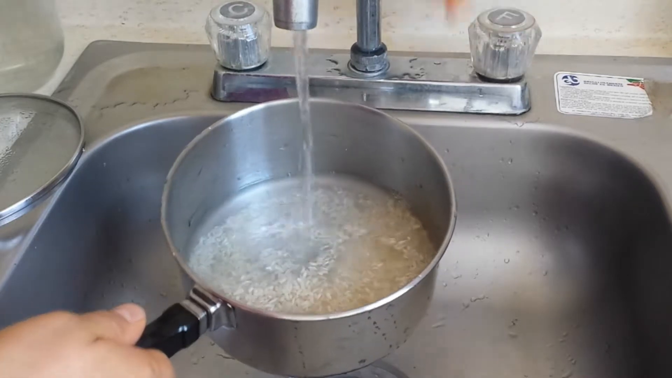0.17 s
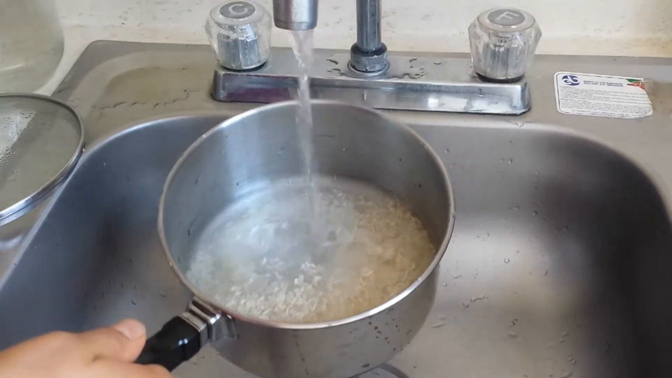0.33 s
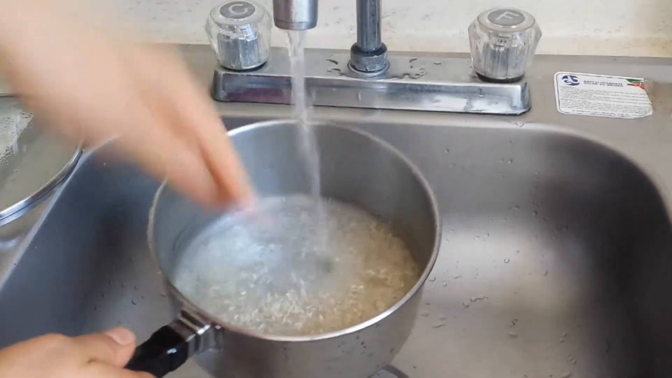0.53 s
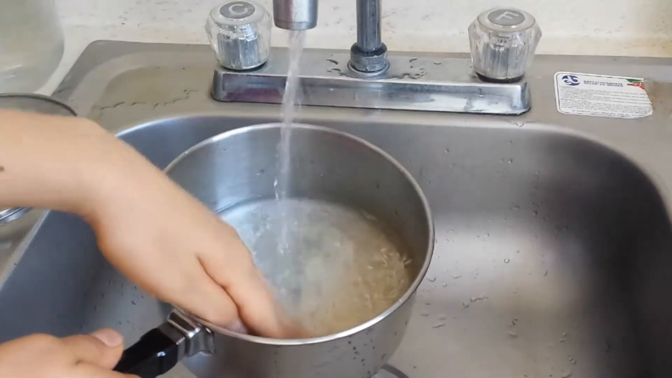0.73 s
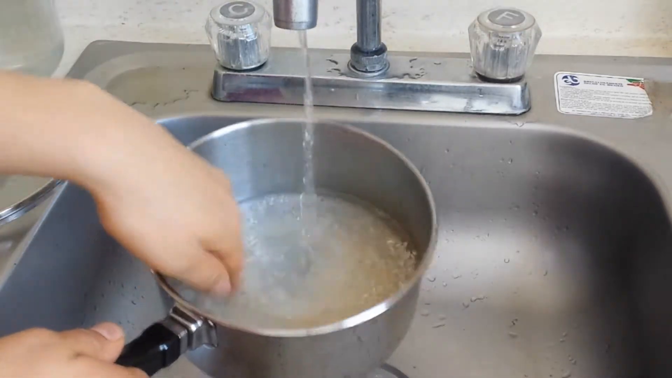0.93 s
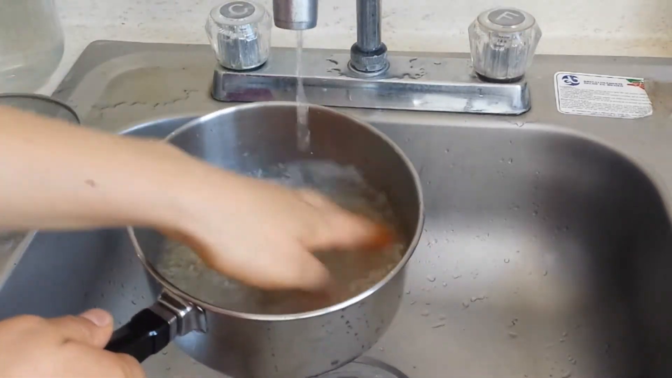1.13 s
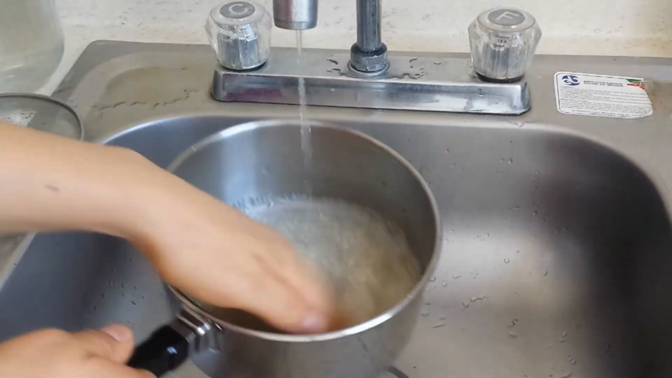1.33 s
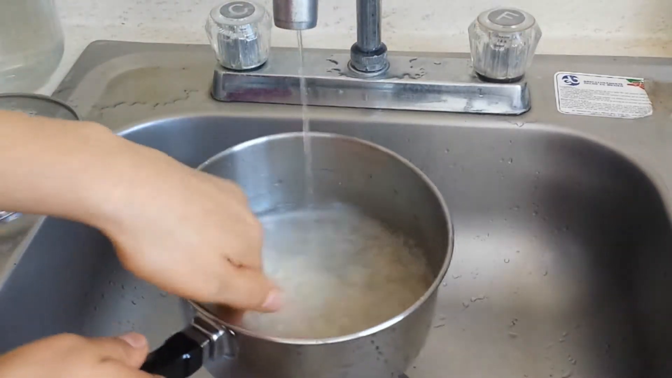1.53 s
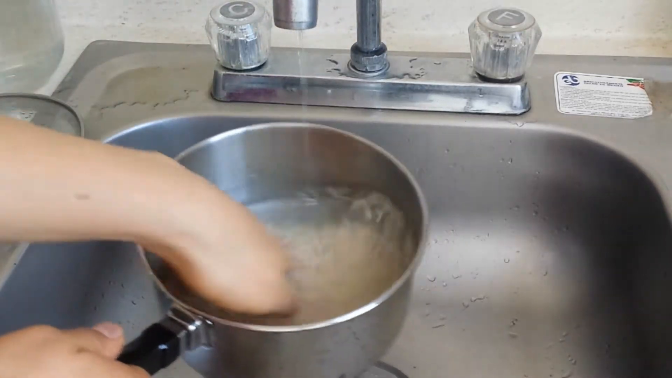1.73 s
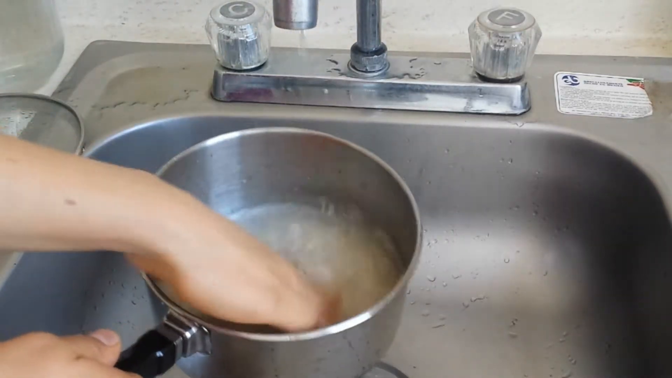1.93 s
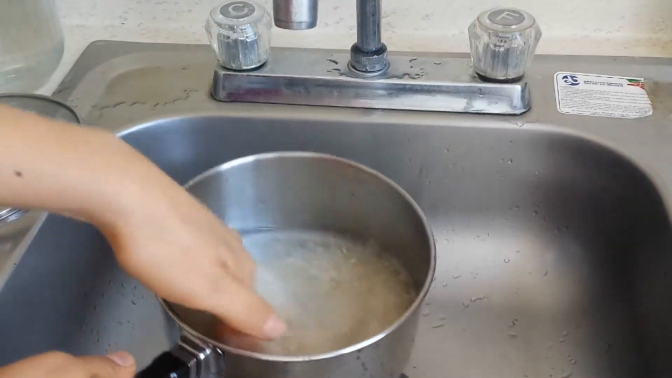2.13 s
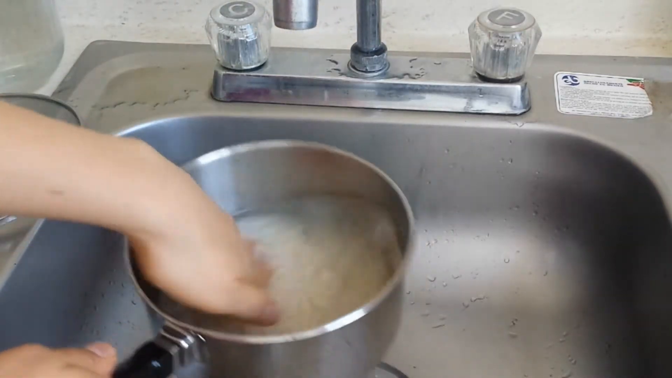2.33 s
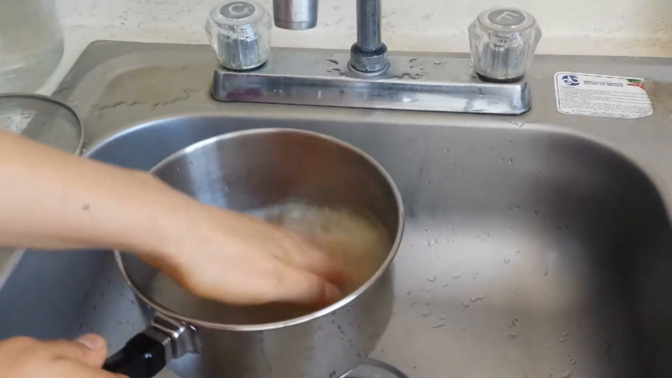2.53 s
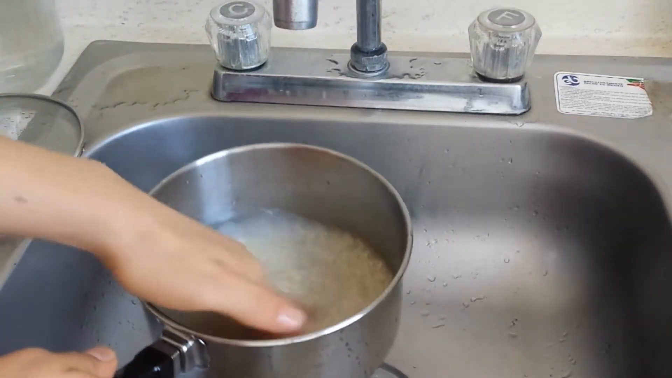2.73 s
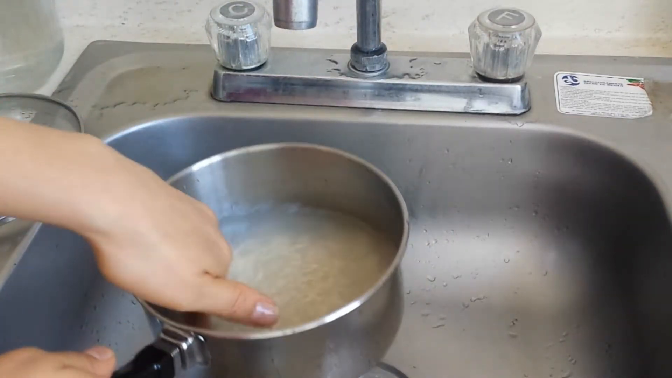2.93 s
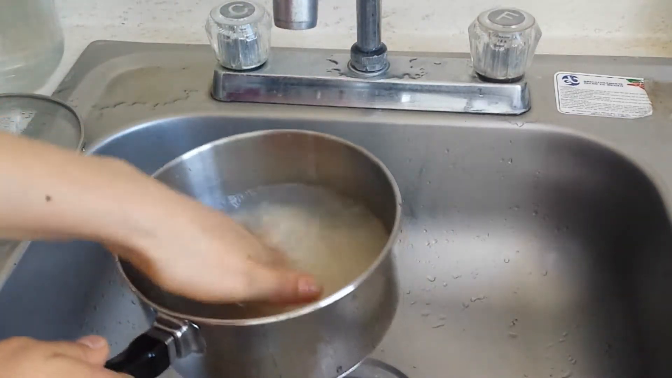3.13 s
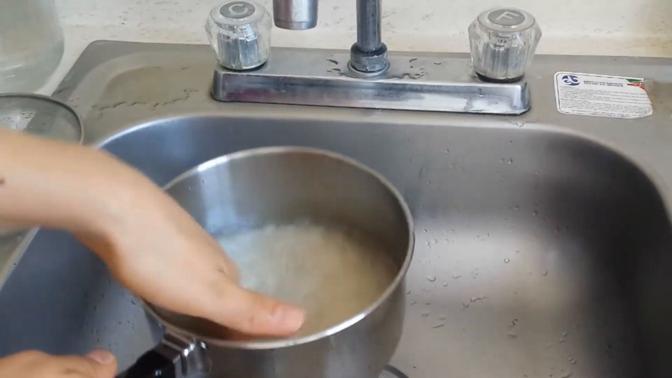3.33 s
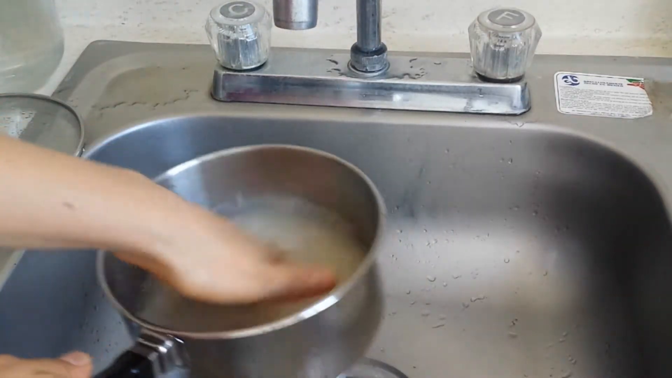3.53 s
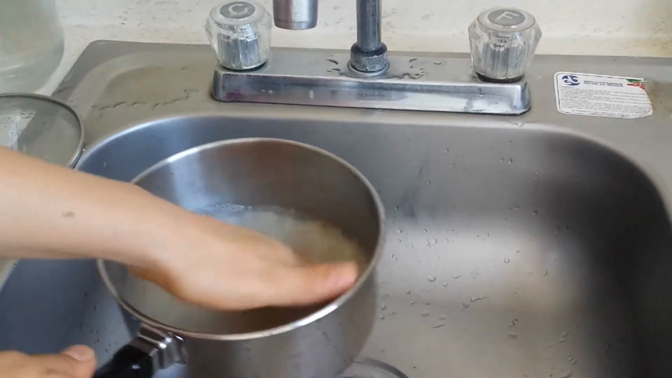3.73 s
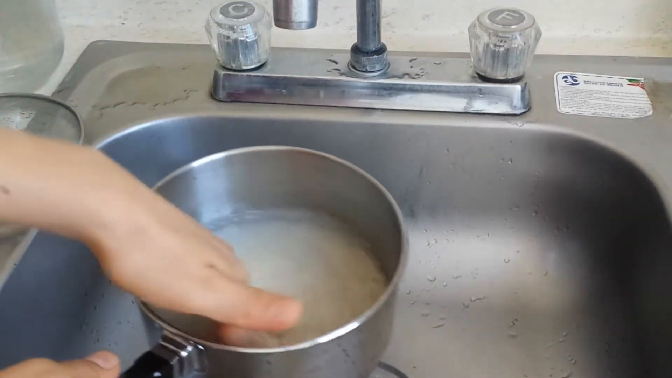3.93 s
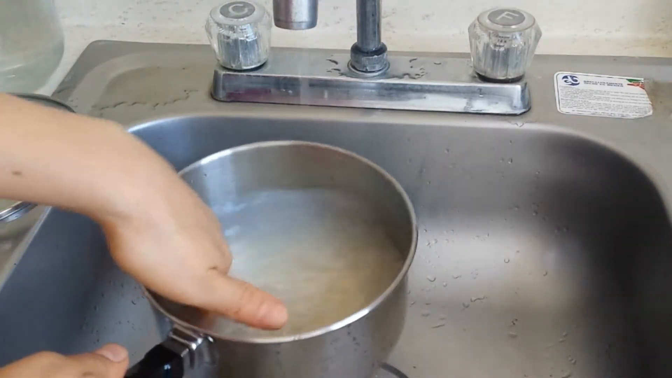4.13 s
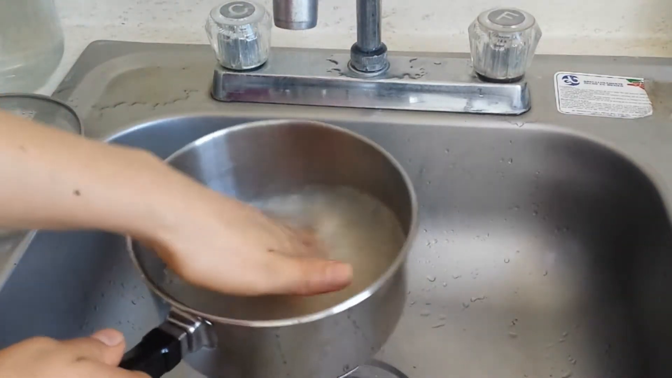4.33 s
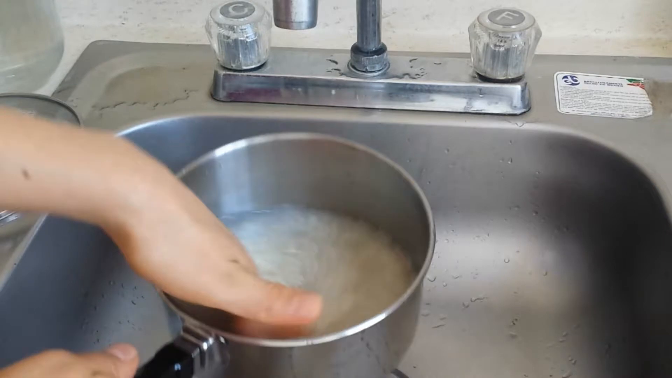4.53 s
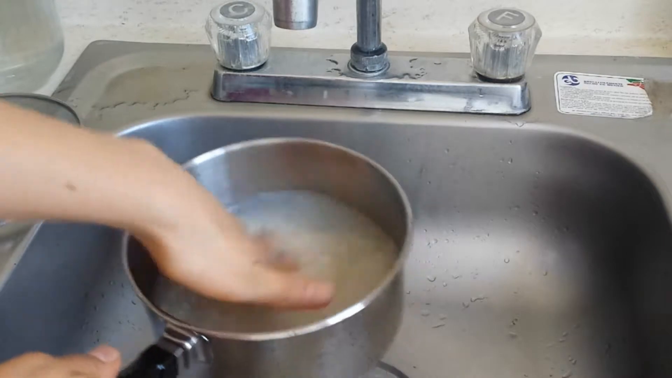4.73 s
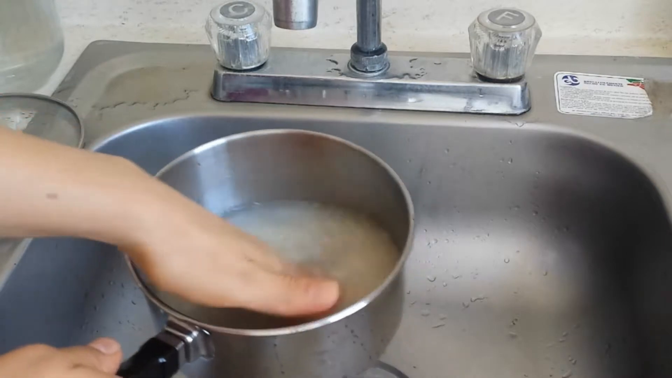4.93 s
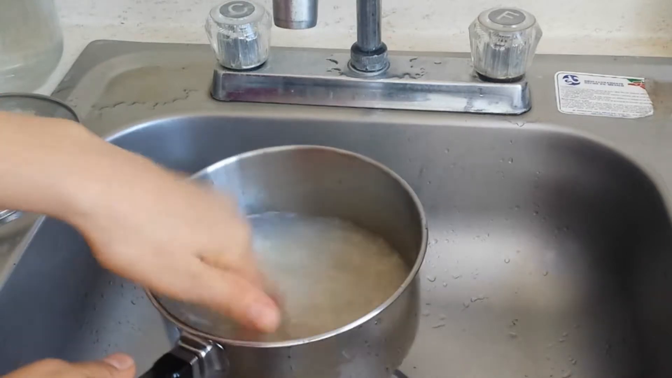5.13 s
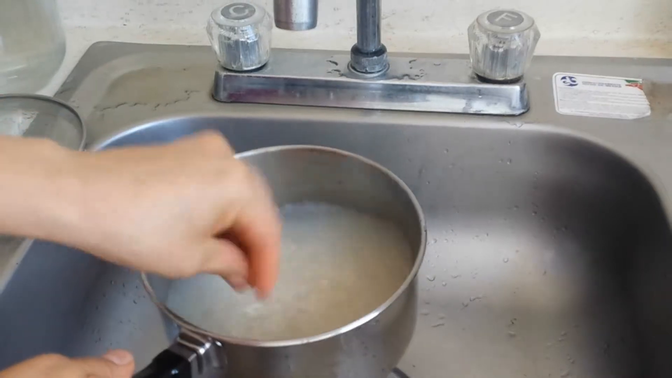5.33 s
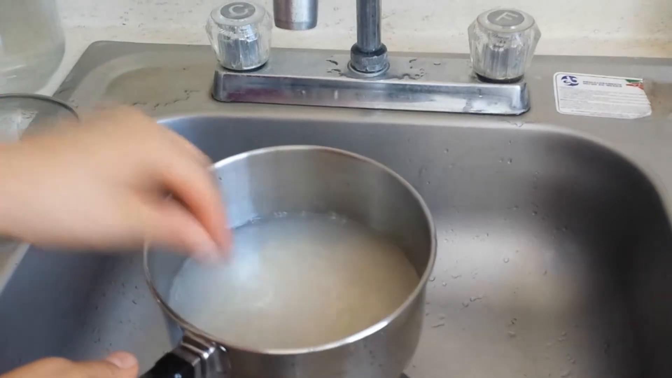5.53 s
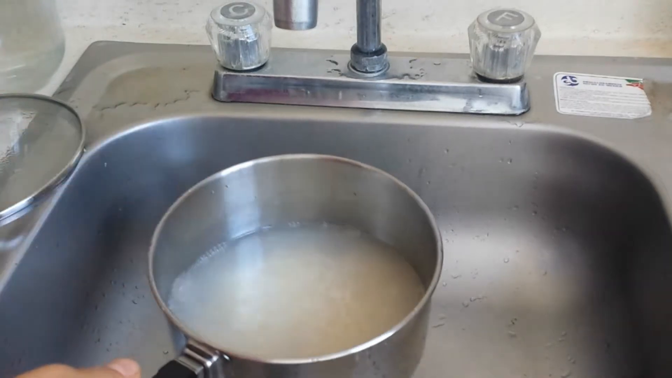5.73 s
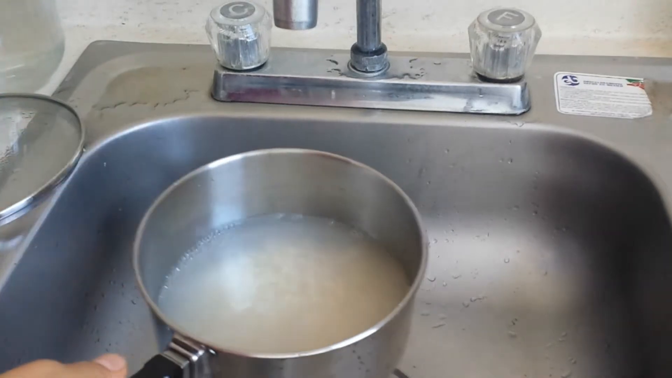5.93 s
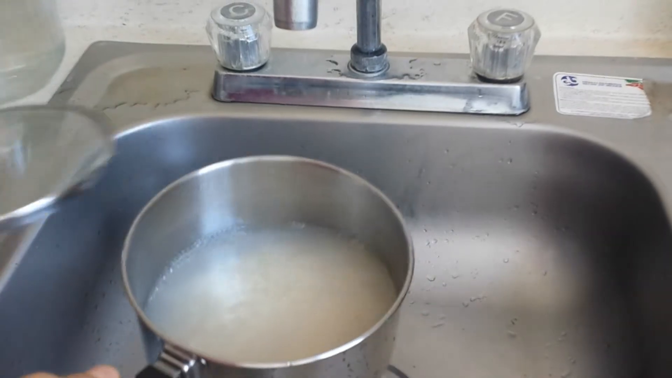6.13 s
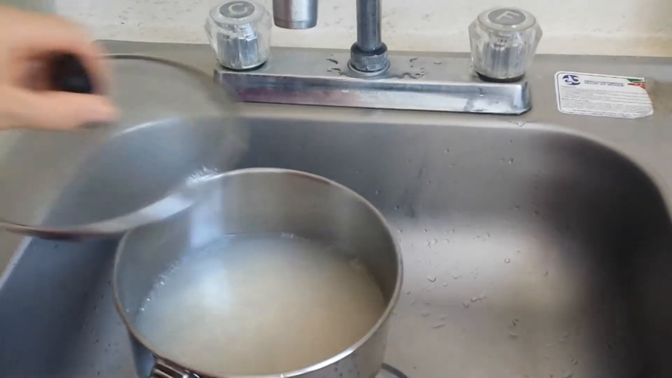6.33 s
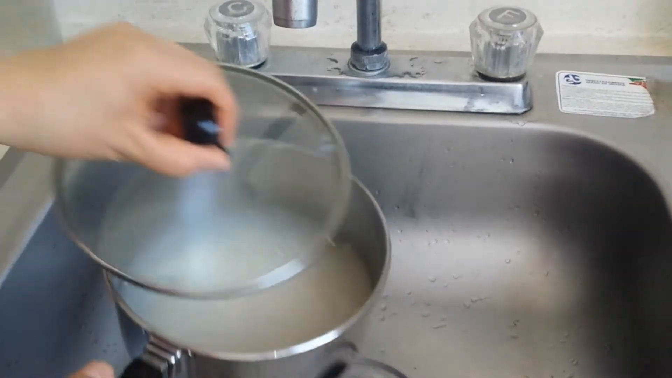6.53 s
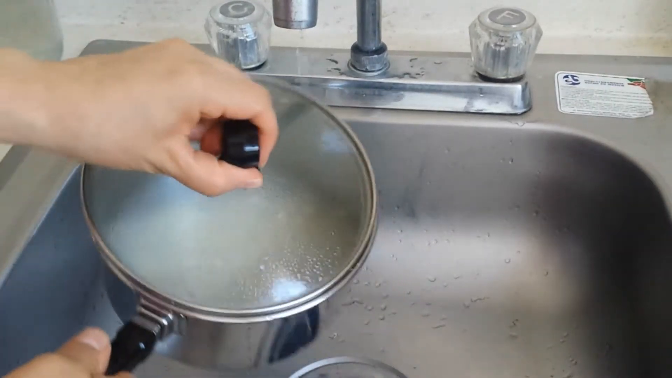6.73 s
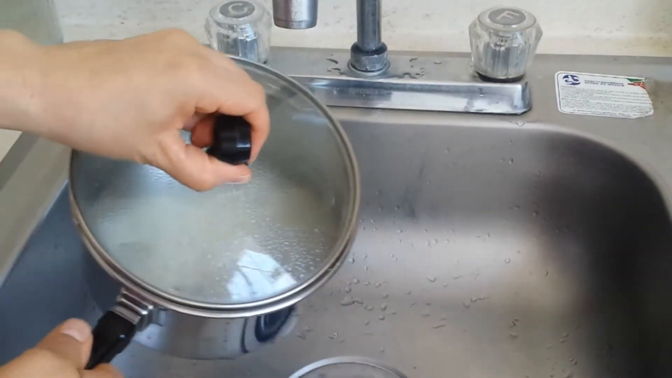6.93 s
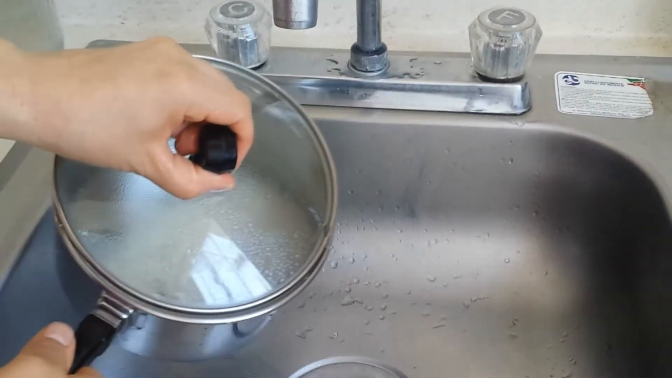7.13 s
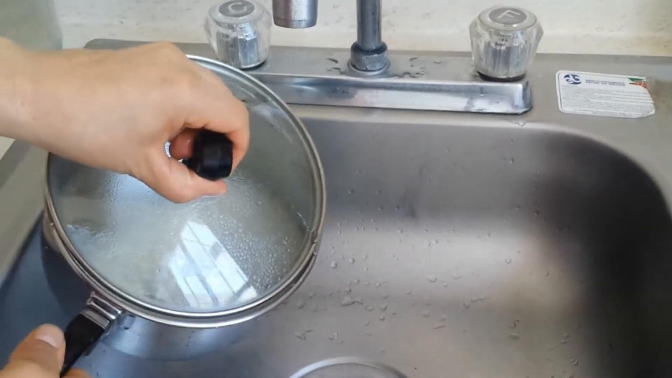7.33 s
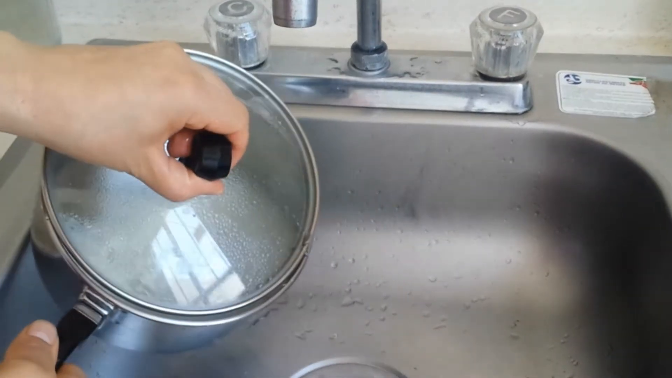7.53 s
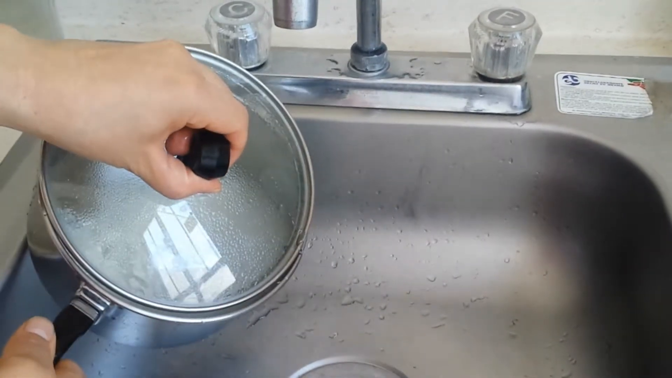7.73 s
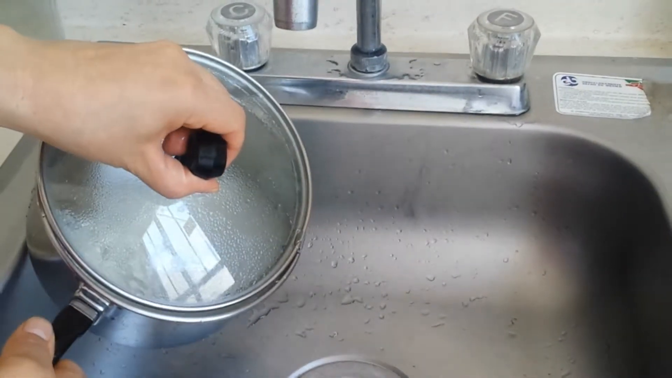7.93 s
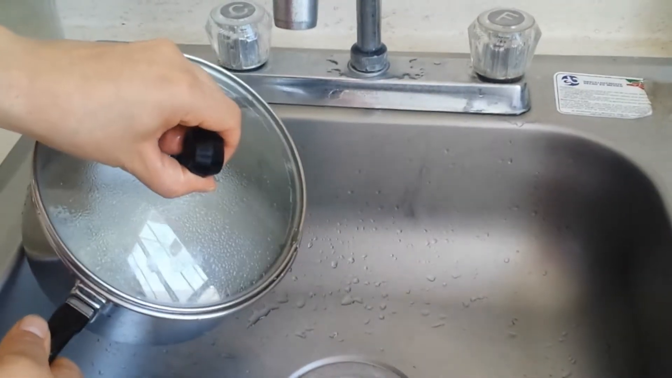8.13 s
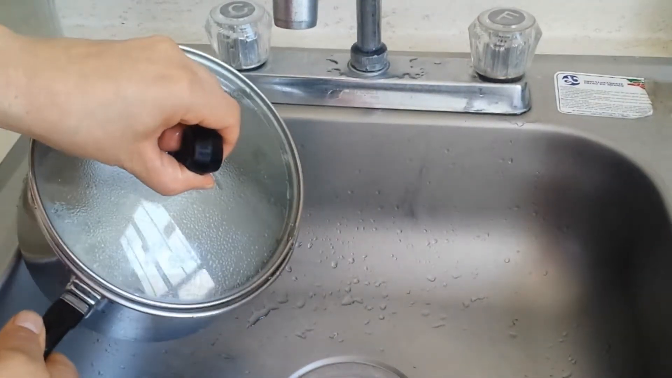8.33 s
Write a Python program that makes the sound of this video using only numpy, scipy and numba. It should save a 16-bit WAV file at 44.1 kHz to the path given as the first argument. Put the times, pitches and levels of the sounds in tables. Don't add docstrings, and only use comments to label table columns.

```python
import sys
import numpy as np
from scipy import signal
from scipy.fft import rfft, irfft, next_fast_len
from scipy.io import wavfile
from scipy.ndimage import uniform_filter1d, map_coordinates
from numba import njit

SR = 44100
rng = np.random.default_rng(int(sys.argv[2]) if len(sys.argv) > 2 else 0)


def dump(signal):
    limited = np.clip(np.atleast_2d(signal).T, -1, 1)
    pcm = np.round(limited * 32767).astype(np.int16)
    wavfile.write(sys.argv[1], SR, pcm)


def invert_db(level):
    return 10 ** (np.asarray(level, dtype=float) / 20)


N = 369999
T = np.arange(N) / SR

# [t/s, level/dB]
GAIN = [(0, -53), (1.2, -58.5), (2, -59), (2.45, -65), (3, -63), (3.7, -62), (3.95, -64.5), (4.8, -64),
        (5.3, -69.5), (6, -66), (7.2, -63), (7.8, -66.5), (8.39, -62.5)]
# [f/Hz, level/dB per Hz]
RUMBLE = [(15, -42), (25, 8.5), (119, -1.5), (162, -1), (234, -9), (294, -7.5), (350, -5), (393, -11.5),
          (578, -13), (728, -15), (2500, -25), (3250, -52.5), (5500, -120)]
# [f/Hz, level/dB per Hz]
HISS = [(710, -6.5), (1200, -12), (2060, -15), (2590, -12.5), (3700, -16), (7570, -16), (8910, -17.5),
        (16000, -18.5)]
HISS_DB = -72
HUM_DB = [2.5, 4.5, -13, 0, -4, 3, -10, -8, -33.5, -4, -19, -17]
MAINS_HZ, FRIDGE_DB = 58.3, -6
# [start t/s, end t/s, f/Hz, level/dB]
PIPES = [
    (2.94, 3.9, 74, -60),
    (1.47, 2.92, 551, -71.5),
]

# [f/Hz, t60/s]
KITCHEN = [(150, 0.59), (500, 0.65), (2000, 0.57), (6000, 0.46), (14000, 0.048)]
# [f/Hz, side minus mid level/dB]
WIDTH = [(100, -14), (400, -14), (520, -1), (2000, 0), (8000, 1)]
# [f/Hz, left minus right level/dB]
PORTS = [(60, -3), (110, 3), (200, -1), (380, -0.5), (700, -1), (1290, 1.5), (2380, -0.5), (4400, 5),
         (8120, -1.5), (15000, -13.5)]
WATER_REACH, RIM_REACH = 0.8, 0.95
SWAY_S = .00012

# [f/Hz, level/dB, t60/s]
PAN_BASE = [(222, -11.5, 0.15), (285, -3, 0.17), (345.2, 0, 0.17), (379.2, 0, .17), (406, -3.5, 0.1),
            (479, -7.5, 0.1), (554.4, -8, 0.12), (649, -6.5, 0.17), (828, -11, 0.18), (871, -11.5, 0.15),
            (1080, -9.5, 0.18)]
# [f/Hz, level/dB, t60/s]
PAN_WALL = [(1270, -22, .08), (1473, -12.5, .08), (1570, -12.5, 0.089), (1842, -7, 0.1),
            (1920, -11.5, 0.08), (2070, -13.5, 0.051), (2330, -9.5, 0.08), (2360, -6, .12)]
# [f/Hz, level/dB, t60/s]
LID_GLASS = [(3065, -8, 0.11), (3140, -22.5, .15), (4270, -8, 0.14), (4430, -8.5, .12), (5170, -7.5, 0.16),
             (5610, -29, 0.069), (5920, -21.5, .15), (6160, -25, 0.08), (6700, -10.5, 0.12),
             (7730, -16, .1), (8400, -13, 0.04)]
# [f/Hz, level/dB, t60/s]
RUBBED_WALL = [(1150, -14, 0.14), (1900, -33, 0.069), (2363, -5.5, 0.035), (2425, -3.5, 0.049),
               (3620, -10.5, 0.038)]
RING_S = .17
# [f/Hz, level/dB per Hz]
CLATTER = [(47, -63.5), (80, -31), (378, -7.5), (1220, -14), (1460, -14.5), (1700, -14), (2380, -19),
           (3620, -22), (5400, -13.5), (16000, -34)]
# [t/s, pan base level/dB, pan wall level/dB, glass level/dB, clatter level/dB]
KNOCKS = [
    (5.995, -39, -70, -79, -59.5),
    (6.393, -80.5, -80, -72, -72.5),
    (6.424, -54.5, -55.5, -61.5, -44),
    (6.662, -36.5, -47.5, -38, -28.5),
    (6.689, -36.5, -42.5, -38.5, -32.5),
    (6.714, -32.5, -46.5, -30.5, -26.5),
    (6.765, -33.5, -19.5, -28.5, -22.5),
    (6.799, -35, -39.5, -43.5, -40),
    (7.128, -65.5, -65, -66.5, -65),
]
# [t/s, length/s, pan base level/dB, pan wall level/dB, lid level/dB]
SLIDES = [(4.18, 0.072, -70, -77, -69), (4.953, 0.068, -71.5, -74, -73.5), (6.031, 0.016, -53, -60, -58.5),
          (6.058, 0.013, -45.5, -56, -39.5), (6.11, 0.039, -49, -61, -60), (6.438, 0.031, -63, -80, -78.5),
          (6.46, 0.017, -73, -59, -63), (6.507, 0.047, -58, -73, -60), (6.855, 0.053, -48.5, -65, -68.5),
          (6.972, 0.015, -56.5, -52.5, -60), (7.149, 0.049, -65, -64, -61.5),
          (8.142, 0.036, -73, -57.5, -58.5), (8.192, 0.022, -56, -69, -63), (8.312, 0.063, -64, -86, -72),
          (8.385, 0.027, -69, -73, -66.5)]
SLIDE_GLASS_DB = -4
# [t/s, peak level/dB, f/Hz, decay/cycles]
CLANKS = [(.001, -22.5, 460, 1.04), (1.156, -27, 2770, 4.7), (4.2, -61, 1150, 30), (4.25, -56, 1150, 35),
          (4.912, -62, 1900, 26), (5.993, -33.5, 407, 0.88), (6.045, -39, 3065, 40), (6.055, -33, 4280, 50),
          (6.07, -33.5, 6530, 38), (6.055, -38, 900, 25), (6.056, -31, 5500, 60), (6.075, -40.5, 5800, 220),
          (6.07, -48, 5700, 51), (6.424, -49, 699, 65), (6.425, -34, 84, 0.97), (6.49, -43, 86, 2.4),
          (6.664, -29, 660, 36), (6.715, -26.5, 1466, 24), (6.664, -34, 1370, 23), (6.716, -26, 680, 15),
          (6.766, -13, 390, 4.6), (6.768, -27.5, 1475, 12), (6.769, -34.5, 1070, 5.5),
          (6.772, -26, 2500, 20), (6.785, -31, 2500, 15), (6.67, -28, 840, 22), (6.70, -27, 650, 10),
          (6.774, -25, 2364, 36), (6.80, -28, 2355, 44), (6.80, -25, 380, 9), (6.768, -24, 344, 14),
          (6.0, -44.5, 310, 11), (6.95, -49, 3170, 62), (6.69, -30, 1010, 11), (6.722, -29.5, 1360, 8),
          (6.775, -21, 4240, 33), (6.775, -35.5, 6250, 25), (6.8, -28.5, 555, 8.8),
          (6.776, -38.5, 125, 2.8), (7.13, -45.5, 915, 18), (8.115, -49, 5000, 156), (8.165, -37, 450, 5),
          (8.36, -61, 1340, 25), (8.19, -52, 800, 30), (1.652, -31, 1700, 26)]

# [t/s, peak
# level/dB, f/Hz, foam level/dB]
SPLASHES = [(0.003, -38.5, 5360, -59), (0.0546, -50, 5370, -59), (0.096, -27.5, 5550, -44),
            (0.162, -31.5, 7400, -46), (.108, -46, 6300, -60), (0.195, -32.5, 8450, -41),
            (0.2378, -34.5, 5650, -58), (0.2896, -30.5, 5600, -36), (0.3737, -28, 5200, -38.5),
            (0.4246, -35, 7900, -38), (0.4808, -20, 6300, -41), (0.546, -24, 7140, -39),
            (0.595, -29.5, 5300, -35.5), (.65, -27, 5600, -37.5), (0.69, -31.5, 7300, -56),
            (0.728, -42, 4970, -37), (0.804, -34, 6000, -34.5), (0.9103, -16, 6650, -31),
            (.943, -19, 4700, -41.5), (.7547, -36, 8770, -70), (0.8183, -31.5, 9800, -53),
            (0.867, -35.5, 10100, -58.5), (0.916, -34, 5940, -58), (.9702, -45, 7000, -60),
            (1.0417, -33, 9300, -49), (1.059, -22, 7160, -39), (1.116, -28.5, 6500, -48),
            (1.1555, -24, 5370, -44), (1.3034, -38, 7040, -56), (1.372, -39, 5440, -53),
            (1.564, -27, 6030, -64), (1.8637, -50, 8090, -68), (1.879, -41, 8300, -58),
            (1.918, -25, 4450, -52),
            (2.004, -38, 4630, -59), (2.2133, -50, 5150, -66), (2.4787, -52, 7250, -66),
         (2.609, -57, 6220, -74), (2.6613, -54, 7450, -81), (2.8389, -53, 9500, -72),
         (3.1871, -55, 5100, -55), (3.275, -49, 8300, -60), (3.415, -50, 5400, -57),
         (3.9828, -60, 5620, -72), (4.365, -43, 6400, -76), (4.454, -47, 5930, -66),
         (4.5426, -54, 8300, -74), (4.56, -57, 9000, -72), (4.7027, -51, 6250, -74),
         (4.7386, -52, 6100, -70), (4.793, -50, 6370, -75), (4.8514, -56, 5610, -62.5),
         (4.974, -52, 8000, -82), (2.775, -46, 7800, -74), (2.959, -52, 6000, -59), (3.043, -38, 6000, -52),
         (3.482, -29.5, 5650, -49.5), (3.5515, -37, 6000, -48.5), (3.697, -37.5, 4800, -65),
         (4.144, -45.5, 5090, -73), (4.295, -44, 7340, -78), (4.3475, -63, 5280, -63),
         (5.411, -57.5, 5800, -76), (5.452, -59, 6760, -82)]
# [t/s, peak level/dB, f/Hz]
DROPS = [(0.094, -28.5, 2970), (0.1198, -28.5, 1550), (0.247, -29.5, 3950), (0.2916, -21, 2770),
         (0.4205, -25.5, 4150), (0.4786, -20.5, 2980), (0.5464, -28.5, 3670), (0.6081, -21, 3620),
         (0.7292, -22.5, 2285), (0.7787, -22.5, 3540), (0.833, -23, 2590), (0.9255, -25, 2500),
         (1.063, -29, 4440), (1.104, -34, 1420), (1.155, -20.5, 1460), (1.193, -35, 1530),
         (1.373, -30.5, 3900), (1.495, -34.5, 4470), (1.46, -47, 4670), (1.52, -42.5, 3500),
         (3.31, -52, 2980), (.31, -32.5, 1710), (1.6491, -20, 1650), (1.8794, -40.5, 2800),
         (1.8953, -38, 3480), (1.9178, -25.5, 4340), (3.484, -32, 3620), (3.5655, -45, 2040),
         (3.619, -40, 4950), (3.7, -49, 4500), (4.15, -45.5, 3620), (4.205, -50, 3620), (2.97, -54, 3470),
         (3.03, -56, 3500), (.14, -46, 1650), (.745, -31, 1210)]
# [t/s, peak level/dB, f/Hz, decay/cycles]
BUBBLES = [(.01, -34, 616, 7.8), (.03, -60, 905, 6.8), (.058, -33.5, 820, 9.8), (.095, -32, 690, 8),
           (.16, -33, 830, 11), (.2, -34.5, 857, 17), (.24, -34, 813, 12), (.29, -30, 660, 3.2),
           (.38, -33, 900, 17), (0.12, -18, 795, 5.7), (0.317, -30.5, 856, 10), (0.459, -29.5, 856, 14),
           (0.502, -18.5, 682, 13.4), (0.599, -21, 792, 10.6), (0.668, -29.5, 780, 9.3),
           (0.73, -28.5, 992, 14), (0.809, -38, 862, 38), (0.864, -29, 816, 41), (0.924, -26, 910, 13.5),
           (0.947, -22.5, 694.5, 23), (1.096, -37, 836, 16), (1.115, -30, 956, 14.4)]
# [t/s, peak level/dB, start f/Hz, decay/cycles]
GURGLES = [(.455, -38, 1245, 9.8), (.522, -35.5, 1172, 10), (.55, -32, 940, 13), (.562, -22, 592, 8.1),
           (.595, -41, 1250, 8), (.66, -27, 724, 8.4), (.728, -31, 893, 10), (.732, -38.5, 1370, 14),
           (.805, -35.5, 766, 12), (.865, -31, 887, 9.6), (.922, -31.5, 1050, 10), (1.098, -41, 1150, 10),
           (1.112, -35, 793, 12.6), (1.154, -37, 1295, 10), (1.19, -40, 1444, 14)]
# [t/s, peak level/dB, f/Hz, decay/cycles]
BUMPS = [(0.004, -31, 252, 42), (0.056, -22, 285, 32), (0.066, -23, 345, 33), (0.124, -30, 285, 34),
         (.015, -35, 420, 14), (.062, -30.5, 406, 27), (.095, -32, 410, 18), (0.178, -29.5, 285, 30),
         (0.249, -40.5, 291, 30)]
# [t/s, peak level/dB]
TICKS = [(0.0947, -36), (0.163, -32), (0.1957, -27), (0.29, -26), (0.3755, -19.5), (0.4254, -25),
         (0.4823, -33), (0.5462, -22), (0.598, -31), (0.691, -19.5), (0.7292, -21), (0.804, -18),
         (0.9093, -17), (0.916, -25), (0.9704, -28), (1.0425, -22), (1.06, -34), (1.1186, -19),
         (1.155, -26), (1.304, -37), (1.3718, -45), (1.5643, -41), (1.8796, -30), (1.917, -31),
         (3.0445, -38), (3.481, -37), (3.5508, -47), (3.698, -45), (6.424, -37), (6.663, -15.5),
         (6.7136, -19), (6.7665, -18)]
# [t/s, level/dB]
JET = [(0, -40), (.32, -53), (.5, -50), (.72, -48.5), (.9, -49), (1.02, -61), (1.12, -46), (1.3, -77),
       (1.5, -99)]
# [t/s, level/dB]
STIR = [(.8, -75), (1.2, -74), (1.45, -52.5), (1.6, -54), (1.82, -57), (1.96, -49), (2.12, -60.5),
        (2.33, -57.5), (2.44, -71.5), (2.5, -63), (2.95, -62.5), (3.45, -64.5), (3.68, -56.5), (3.9, -66.5),
        (4.21, -62), (4.7, -66), (5.14, -67.5), (5.4, -88)]
# [t/s, length/s, level/dB]
RUBS = [(2.226, 0.035, -57.5), (2.964, 0.1, -66), (3.296, 0.017, -64), (3.44, .035, -58), (3.5, .02, -62),
        (4.467, 0.027, -84), (4.547, 0.024, -80), (3.7, 0.02, -56), (4.1, 0.065, -63),
        (4.192, 0.026, -45.5), (4.654, 0.034, -59.5), (4.953, 0.064, -87)]
# [f/Hz, level/dB per Hz]
SPRAY = [(1470, -77), (2500, -3.5), (2790, -7), (3570, -8.5), (4150, -11.5), (5150, -2.5), (6450, -2),
         (14500, -14.5), (16000, -22)]
JET_FIZZ_DB, JET_GURGLE_DB, JET_MID_DB = -5.5, -2.5, -3.5
STIR_GURGLE_DB, STIR_MID_DB = -16.5, -19.5
STIR_RUB_DB = -15.5
FIZZ_RISE_S, FIZZ_FADE_S = 0.0015, 0.055
FROTH_DB, FROTH_FADE_S = -14.5, 0.015
RIPPLE_DB, RIPPLE_FADE_S = -23.5, 0.049
SPLASH_CYCLES, DROP_CYCLES, GURGLE_GLIDE = 3.9, 5.03, .16
SPLASH_DRY_DB, DROP_DRY_DB = 3, 2
SPLASH_WET_DB, DROP_WET_DB = -2.5, -0.5
TICK_DB, TICK_S = -7, 0.0013


def unit(x):
    return x / np.sqrt(np.mean(x ** 2))


def shape(x, table):
    hz, db = np.transpose(table)
    size = next_fast_len(x.shape[-1])
    at = np.log(np.maximum(np.fft.rfftfreq(size, 1 / SR), 1))
    gain = invert_db(np.interp(at, np.log(hz), db))
    return irfft(rfft(x, size) * gain, size)[..., :x.shape[-1]]


def band(x, lo_hz, hi_hz):
    return signal.sosfilt(signal.butter(2, [lo_hz, hi_hz], "band", fs=SR, output="sos"), x)


def walk(rate):
    k = int(SR / rate)
    steps = np.repeat(rng.standard_normal(N // k + 1), k)
    return 1.21 * uniform_filter1d(uniform_filter1d(steps, k), k)[:N]


def curve(table):
    s, db = np.transpose(table)
    return invert_db(np.interp(T, s, db, left=-120, right=-120))


def after(s, db, rise_s, fade_s):
    power = np.zeros(N)
    np.add.at(power, (s * SR).astype(int), invert_db(db) ** 2)
    up, down = np.exp(-1 / (rise_s * SR)), np.exp(-2 / (fade_s * SR))
    fading = signal.lfilter([1], [1, -down], power)
    return np.sqrt(signal.lfilter([1 - up], [1, -up], fading))


def wide(x):
    side = shape(x[1], WIDTH)
    return np.array([x[0] + side, x[0] - side])


@njit
def grains(s, size, hz, cycles, glide, rise, sr, count):
    out = np.zeros(count)
    for k in range(len(s)):
        start = int(s[k] * sr)
        life, phase = cycles[k] / hz[k] * sr, 0.
        for i in range(min(int(6 * life), count - start)):
            phase += 2 * np.pi * hz[k] / sr * (1 + glide * min(i / life, 3.))
            swell = min(phase / (2 * np.pi * rise), 1.)
            out[start + i] += size[k] * np.exp(-i / life) * np.sin(phase) * swell
    return out


def listed(table, glide, life, rise=0.011):
    s, db, hz, cycles = np.transpose(table).copy()
    return grains(s, invert_db(db), hz, life * np.maximum(cycles, .5), glide, max(rise, .01), 1. * SR, count=N)


def swarm(count, lo_hz, hi_hz, cycles, scatter_db):
    when, luck, pitch = rng.random((count, 3)).T
    size = invert_db(scatter_db * np.minimum(-np.log(1 - luck), 5.5))
    hz = lo_hz * (hi_hz / lo_hz) ** pitch
    return grains(when * (N - 1) / SR, size, hz, cycles * (.5 + pitch), 0.12, .01, 1. * SR, count=N)


def ring(x, modes):
    out = 0
    for k, (hz, db, t60) in enumerate(modes):
        r = np.exp(-np.log(1000) / (min(t60, RING_S) * SR))
        w = 2 * np.pi * hz / SR
        gain = (-1) ** k * invert_db(db) * np.sin(w) * np.sqrt(1 - r * r)
        out = out + gain * signal.lfilter([1], [1, -2 * r * np.cos(w), r * r], x)
    return out


def background():
    gain_db = np.interp(T, *np.transpose(GAIN))
    rumble = unit(wide(shape(rng.standard_normal((2, N)), RUMBLE))) * invert_db(gain_db + 2.9 * walk(5))
    hum = np.zeros(N)
    for k, db in enumerate(HUM_DB):
        hum += invert_db(db + 0.85 * walk(3.02)) * np.sin(2 * np.pi * (k + 1) * MAINS_HZ * T + k * k)
    pipes = np.zeros(N)
    for start, end, hz, db in PIPES:
        fade = np.clip(np.minimum(T - start, end - T) / 0.094, 0, 1)
        pipes += invert_db(db) * fade * np.sin(2 * np.pi * hz * T)
    hiss = unit(shape(rng.standard_normal((2, N)), HISS)) * invert_db(HISS_DB + 3.0 + 0.63 * (gain_db + 65.5))
    return rumble + hum * invert_db(gain_db + FRIDGE_DB) + pipes + hiss


def kitchen(x, reach):
    t = T[:int(.9 * SR)]
    tail = 0
    for hz, t60 in KITCHEN:
        noise = band(rng.standard_normal((2, len(t))), hz / 2, min(hz * 1.81, 20000))
        tail = tail + unit(noise) * np.sqrt(hz) * np.exp(-np.log(1000) * t / (reach * t60))
    basin = invert_db(9) * np.exp(-t / 0.01)
    tail = wide(tail * (1 + basin) * np.clip(t / 0.0026, 0, 1))[:, :int(.8 * SR)]
    return signal.fftconvolve(x[None], tail / np.sqrt(np.sum(tail ** 2) / 2), axes=1)[:, :N]


def ticks():
    s, db = np.transpose(TICKS)
    crack = after(s, db + TICK_DB, .0001, TICK_S) * rng.standard_normal(N)
    return band(crack, 3500, 12000) * invert_db(5.5)


def lid():
    force, t = np.zeros((4, N + SR)), T[:SR // 4]
    for s, *db in KNOCKS:
        start = int(s * SR)
        force[:, start:start + len(t)] += invert_db(np.array(db)[:, None]) * np.exp(-t / 0.011)
    for s, length, base_db, wall_db, lid_db in SLIDES:
        db = np.array([base_db, wall_db, lid_db + SLIDE_GLASS_DB, lid_db])
        start = int(s * SR) - SR // 8
        force[:, start:start + len(t)] += invert_db(db[:, None]) * np.exp(-((t - 1 / 8) / length) ** 2)
    grit = rng.standard_normal((4, N)) * invert_db(1.3 * walk(300))
    grit[3] = unit(shape(grit[3], CLATTER))
    base, wall, glass, clatter = force[:, :N] * grit
    ringing = ring(base, PAN_BASE) + ring(wall, PAN_WALL) + ring(glass, LID_GLASS)
    return invert_db(4.0) * ringing + invert_db(7) * clatter + listed(CLANKS, 0., 0.93)


def rice(stir):
    effort = invert_db(STIR_RUB_DB) * stir
    for at, length, db in RUBS:
        effort = effort + invert_db(db) * np.exp(-((T - at) / length) ** 2)
    return ring(effort * rng.standard_normal(N) * invert_db(-3.0 + 4.6 * walk(60)), RUBBED_WALL)


def spray():
    return unit(shape(swarm(count=9000, lo_hz=3210, hi_hz=14950, cycles=3.3, scatter_db=2.5), SPRAY))


def water():
    jet, stir = curve(JET), curve(STIR)
    s, db, hz, foam_db = np.transpose(SPLASHES)
    drop, bubble = np.transpose(DROPS), np.transpose(BUBBLES)
    foam = after(s, foam_db, FIZZ_RISE_S, FIZZ_FADE_S)
    fizz = np.sqrt(foam ** 2 + stir ** 2 + (invert_db(JET_FIZZ_DB) * jet) ** 2)
    fizz = fizz * invert_db(-1.5 + 1.9 * walk(40) + 1.4 * walk(8.7))
    froth = after(bubble[0], bubble[1] + FROTH_DB, FIZZ_RISE_S, FROTH_FADE_S)
    churn = invert_db(JET_GURGLE_DB) * jet + invert_db(STIR_GURGLE_DB) * stir + froth
    ripple = after(drop[0], drop[1] + RIPPLE_DB, FIZZ_RISE_S, RIPPLE_FADE_S)
    ripple = invert_db(JET_MID_DB) * jet + invert_db(STIR_MID_DB) * stir + ripple
    gurgle = unit(band(swarm(count=1400, lo_hz=622, hi_hz=1755, cycles=5.4, scatter_db=3.0), 500, 1900))
    mid = unit(band(swarm(count=5000, lo_hz=1150, hi_hz=3670, cycles=3.4, scatter_db=3.5), 1200, 4900))
    bed = invert_db(-1.0) * fizz * spray() + invert_db(-5.0) * churn * gurgle + invert_db(-7.0) * ripple * mid + rice(stir)
    splashes = listed(np.c_[s, db, hz, 0 * s + SPLASH_CYCLES], 0.04, 0.48)
    splashes = band(splashes, 5060, 14200) * invert_db(13.5)
    drops = listed(np.c_[DROPS, 0 * drop[0] + DROP_CYCLES], 0.0016, 0.79, rise=1.4)
    drops = band(drops, 2000, 11000) * invert_db(6.0)
    bubbles = listed(BUBBLES, 0.054, 0.42, rise=1.2) + listed(GURGLES, GURGLE_GLIDE, 0.98, rise=1.6)
    low = band(bubbles, 673, 2700) + listed(BUMPS, 0., 0.24)
    scattered = invert_db(-1.5) * fizz * np.array([spray(), spray()])
    return bed + low, splashes, drops, scattered


def scene():
    bed, splashes, drops, scattered = water()
    touches = lid()
    close = bed + invert_db(SPLASH_DRY_DB) * splashes + invert_db(DROP_DRY_DB) * drops + invert_db(1.0) * touches
    direct = np.array([np.roll(close, 3), close]) + ticks()
    near = bed + invert_db(SPLASH_WET_DB) * splashes + invert_db(DROP_WET_DB) * drops
    echoes = invert_db(-0.5) * kitchen(near, WATER_REACH) + invert_db(-1.0) * kitchen(touches, RIM_REACH)
    echoes = np.array([map_coordinates(e, [(T + SWAY_S * walk(18)) * SR], mode="mirror") for e in echoes])
    heard = invert_db(-4.0) * direct + echoes + scattered
    tilt = np.array(PORTS) * [1, .5]
    return np.array([shape(heard[0], tilt), shape(heard[1], tilt * [1, -1])]) + background()


def band_limit(x):
    return signal.sosfilt(signal.butter(12, 16520, fs=SR, output="sos"), x)


def record(dry):
    mic = signal.sosfilt(signal.butter(3, 40, "high", fs=SR, output="sos"), dry)
    mic = signal.sosfilt(signal.ellip(6, .3, 40, 15300, fs=SR, output="sos"), mic)
    return band_limit(mic)


dry = scene()
out = record(dry)
dump(out)
```